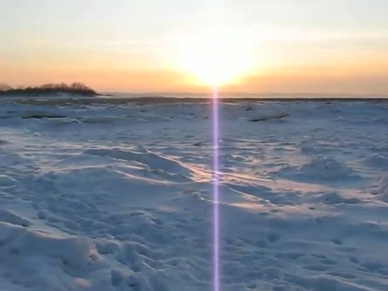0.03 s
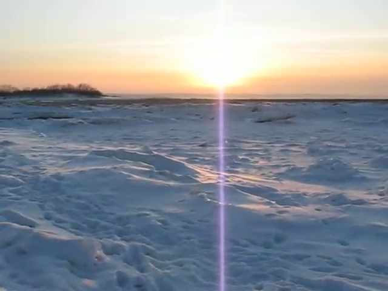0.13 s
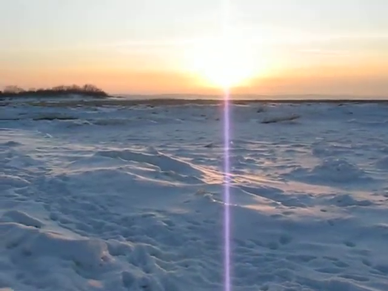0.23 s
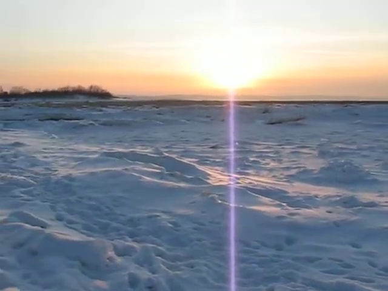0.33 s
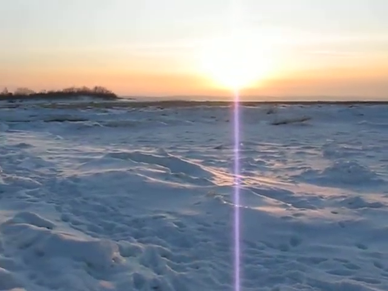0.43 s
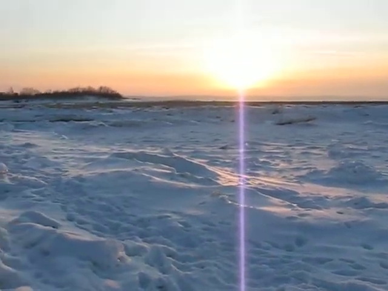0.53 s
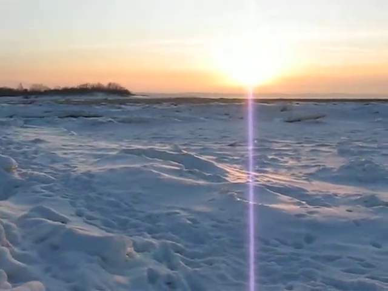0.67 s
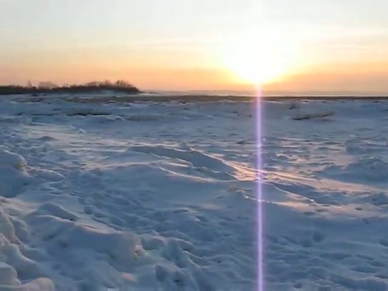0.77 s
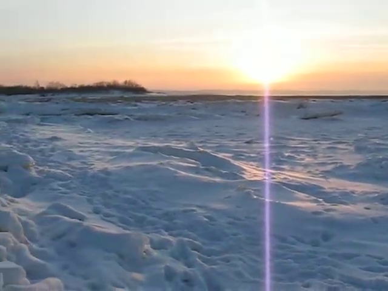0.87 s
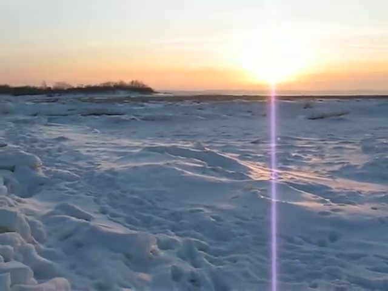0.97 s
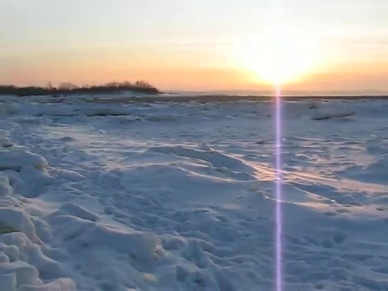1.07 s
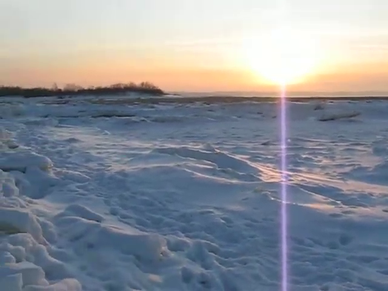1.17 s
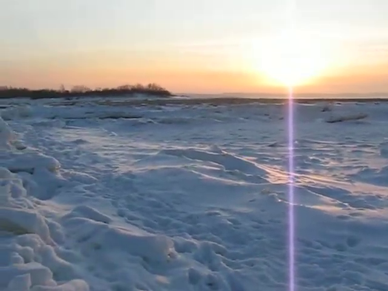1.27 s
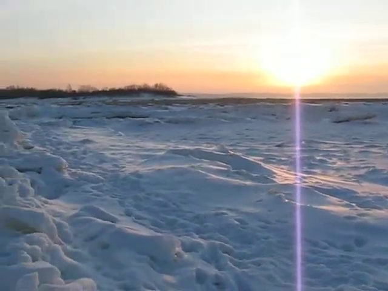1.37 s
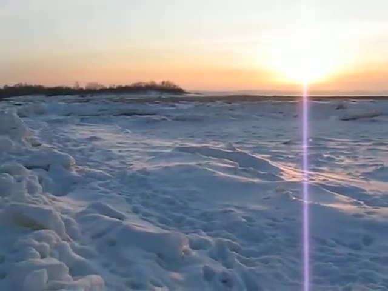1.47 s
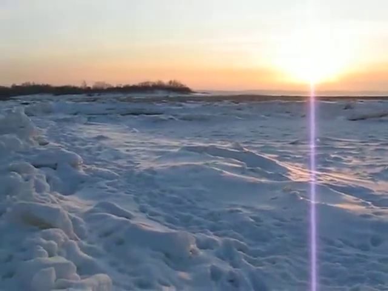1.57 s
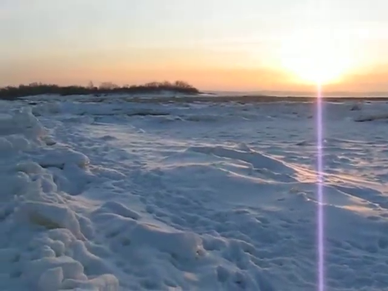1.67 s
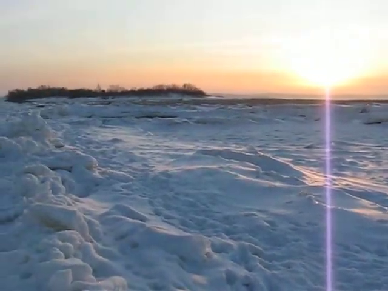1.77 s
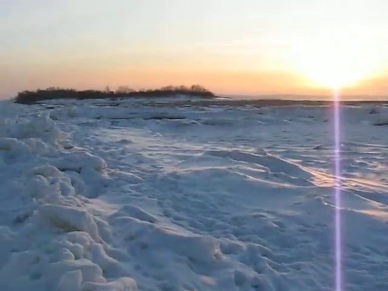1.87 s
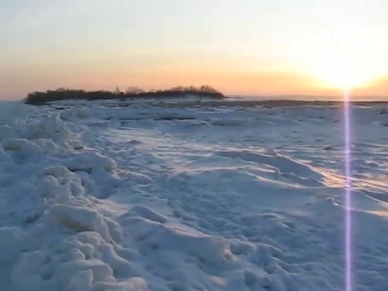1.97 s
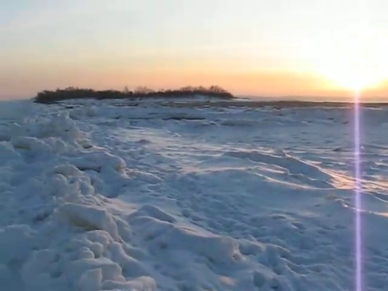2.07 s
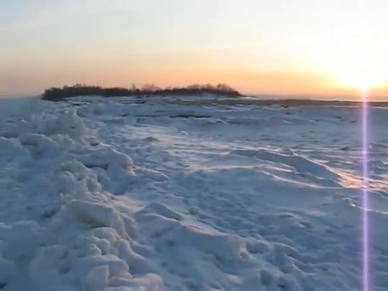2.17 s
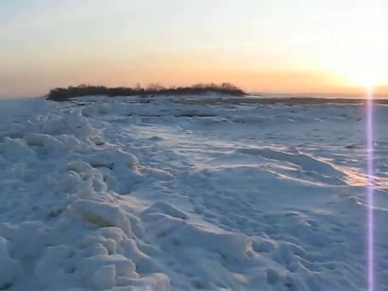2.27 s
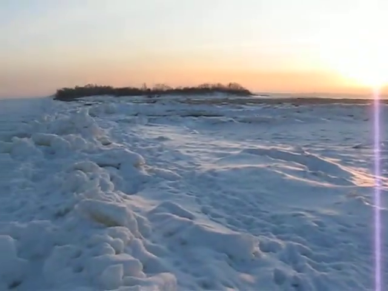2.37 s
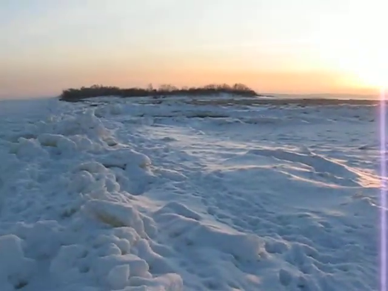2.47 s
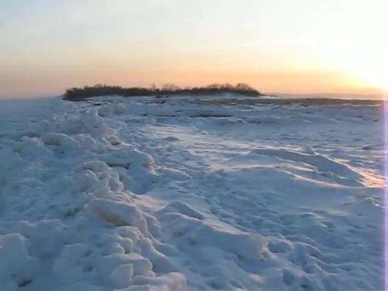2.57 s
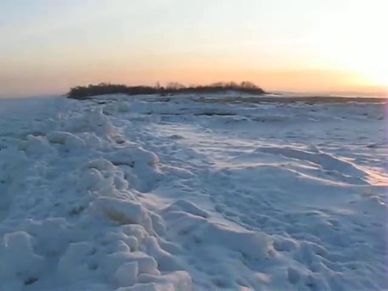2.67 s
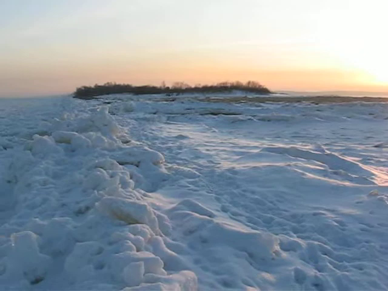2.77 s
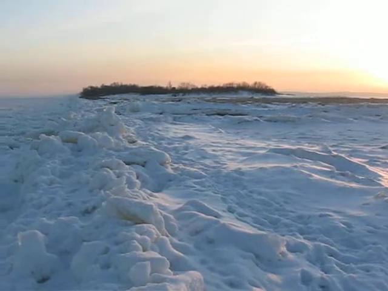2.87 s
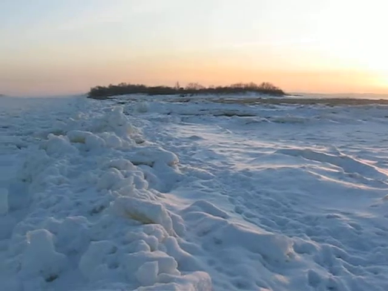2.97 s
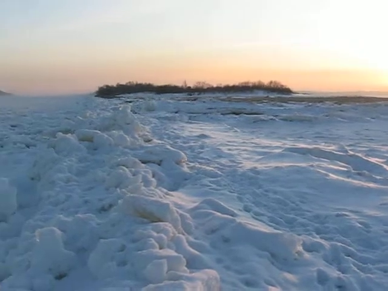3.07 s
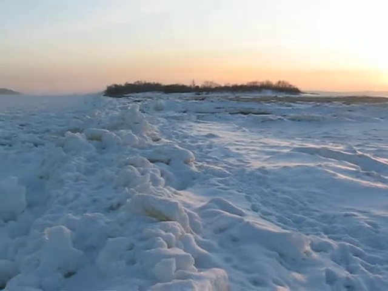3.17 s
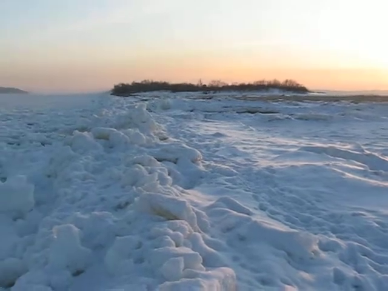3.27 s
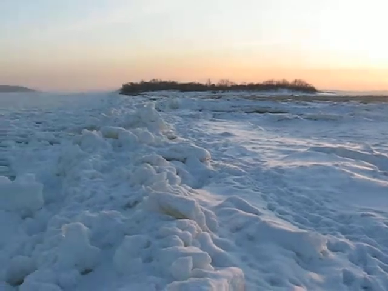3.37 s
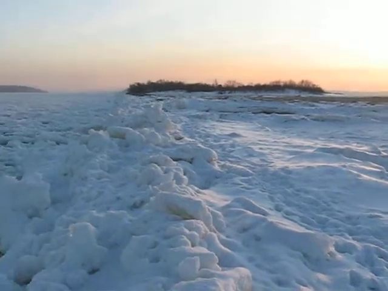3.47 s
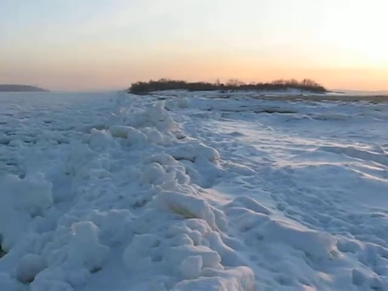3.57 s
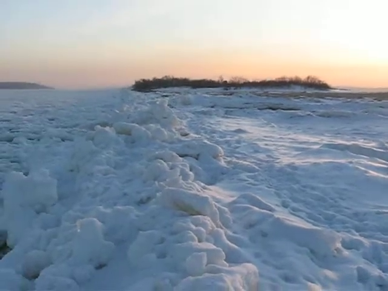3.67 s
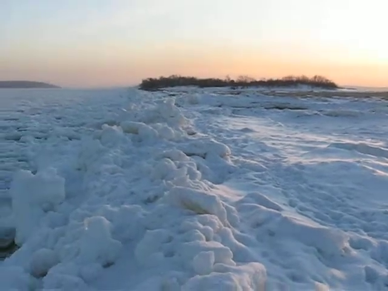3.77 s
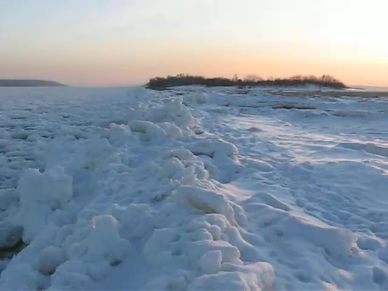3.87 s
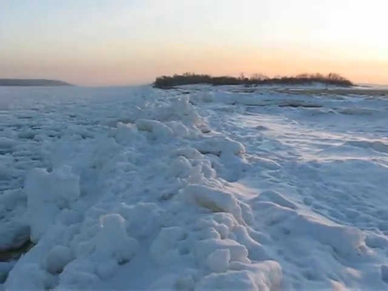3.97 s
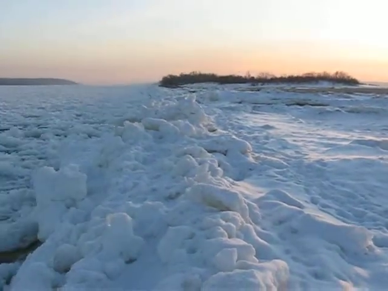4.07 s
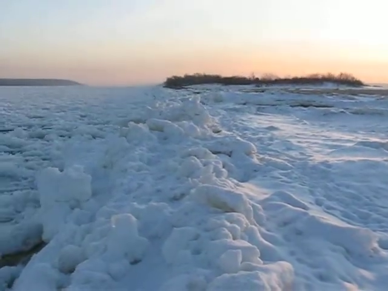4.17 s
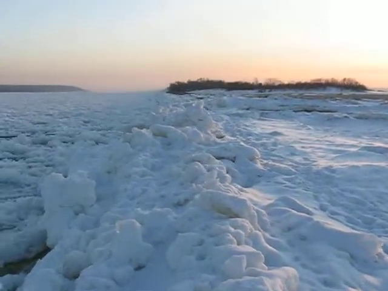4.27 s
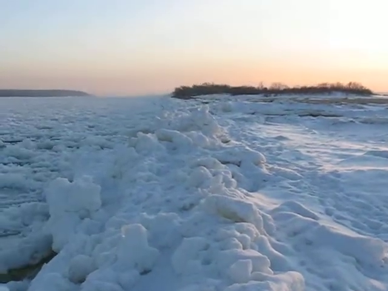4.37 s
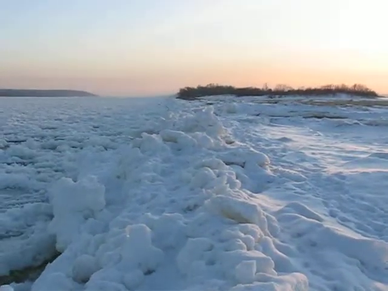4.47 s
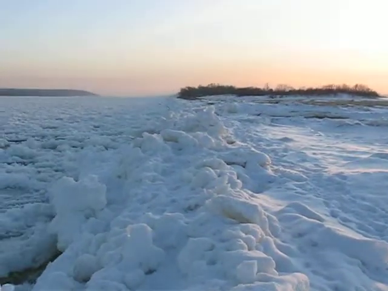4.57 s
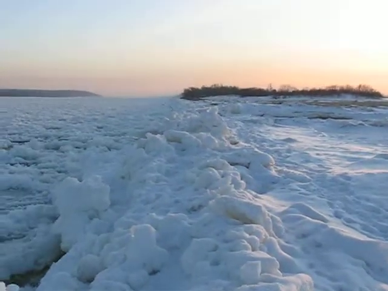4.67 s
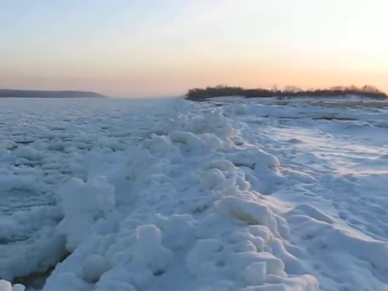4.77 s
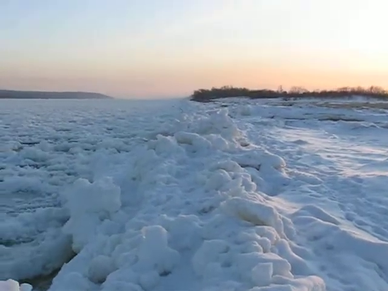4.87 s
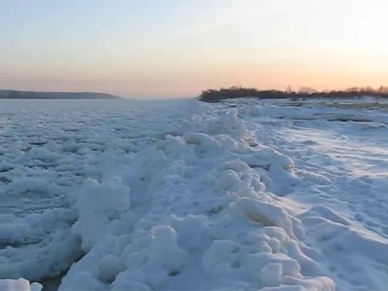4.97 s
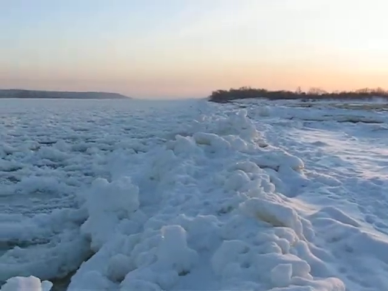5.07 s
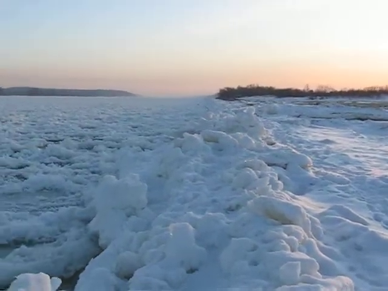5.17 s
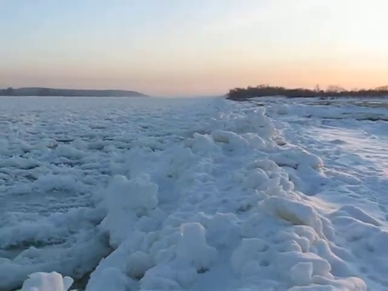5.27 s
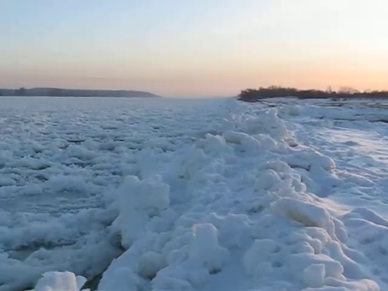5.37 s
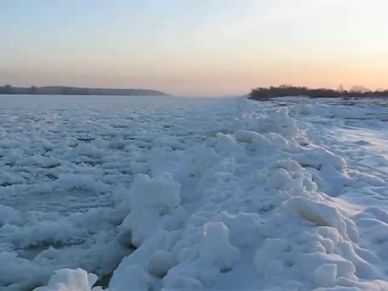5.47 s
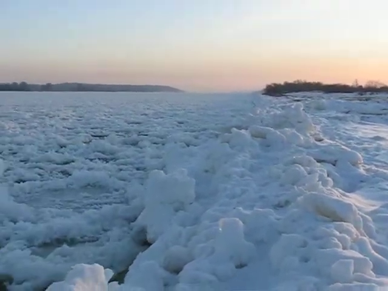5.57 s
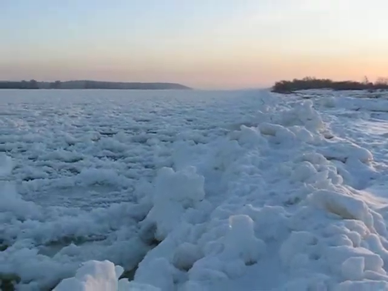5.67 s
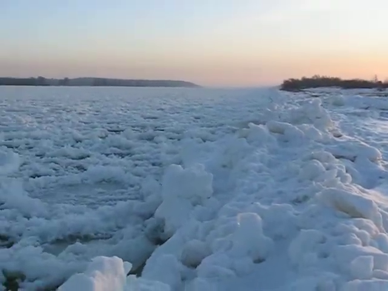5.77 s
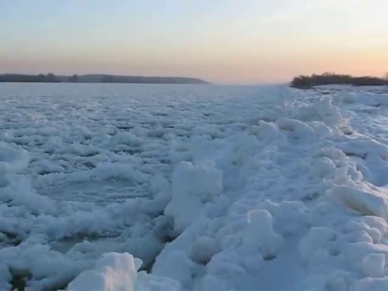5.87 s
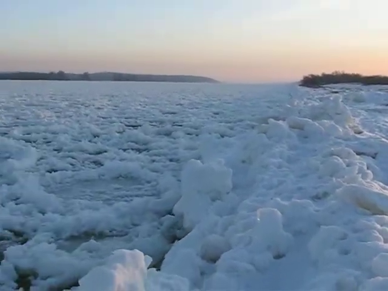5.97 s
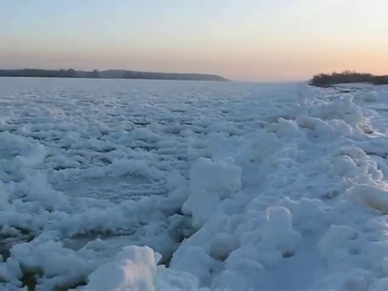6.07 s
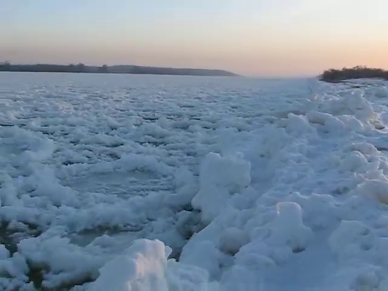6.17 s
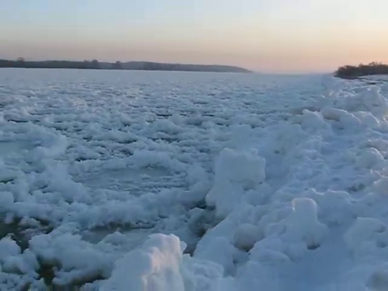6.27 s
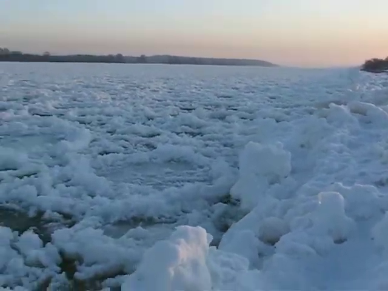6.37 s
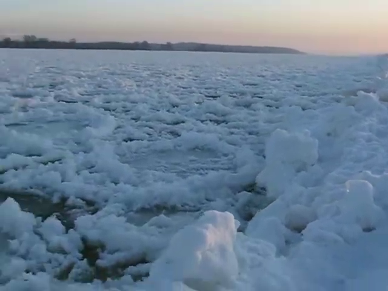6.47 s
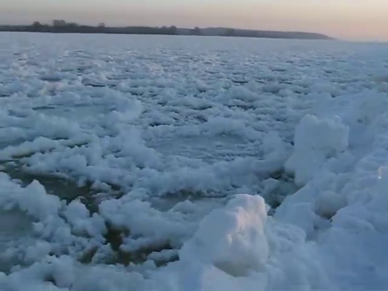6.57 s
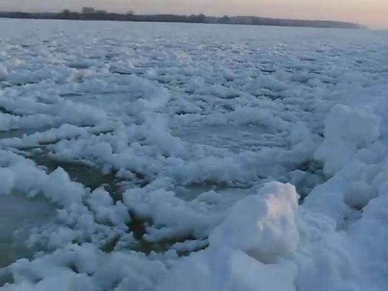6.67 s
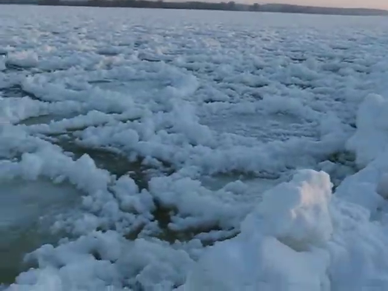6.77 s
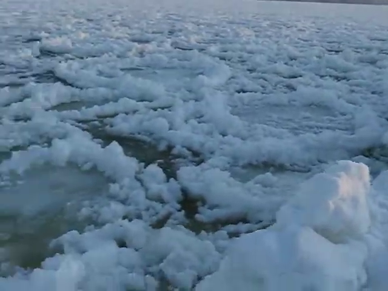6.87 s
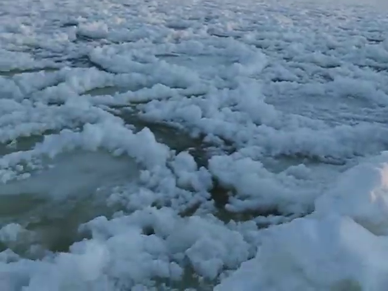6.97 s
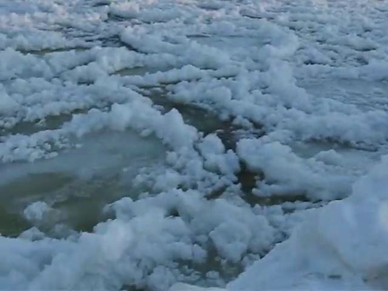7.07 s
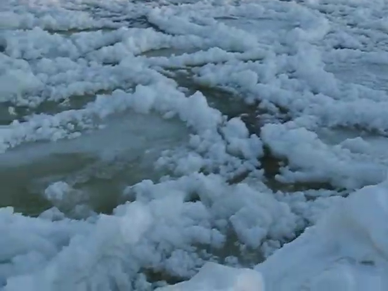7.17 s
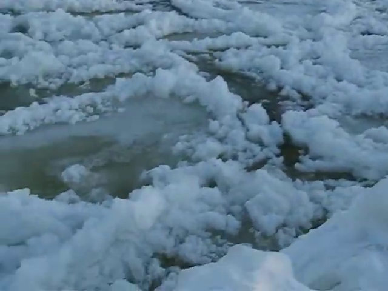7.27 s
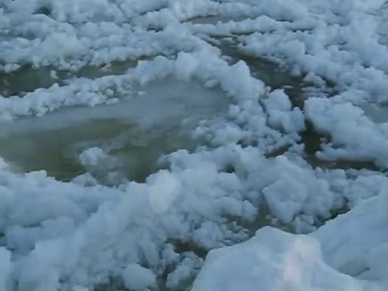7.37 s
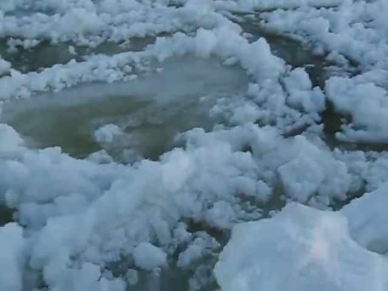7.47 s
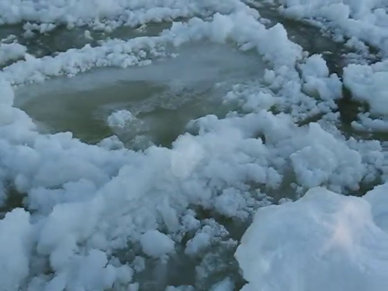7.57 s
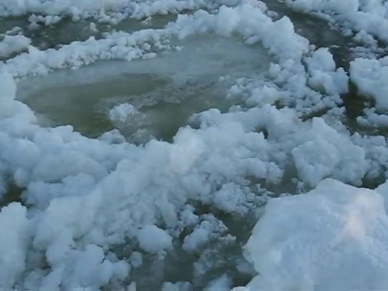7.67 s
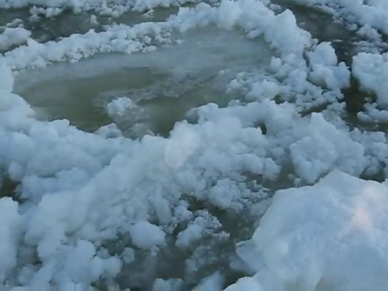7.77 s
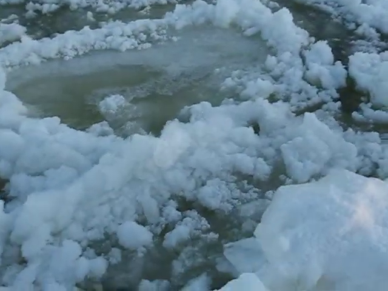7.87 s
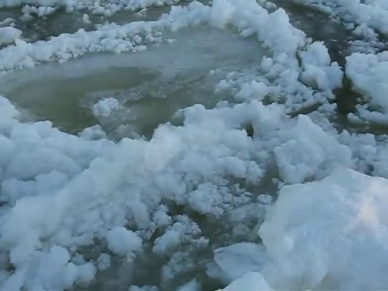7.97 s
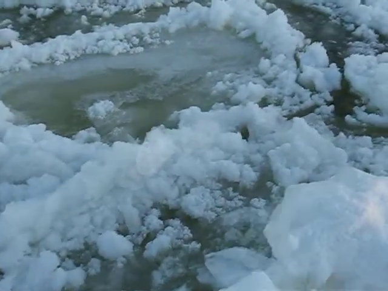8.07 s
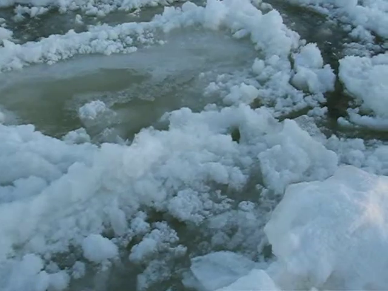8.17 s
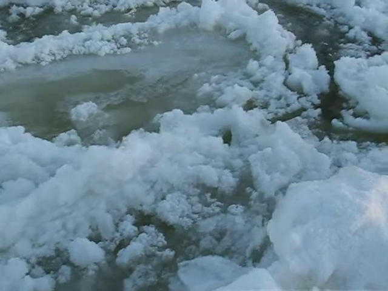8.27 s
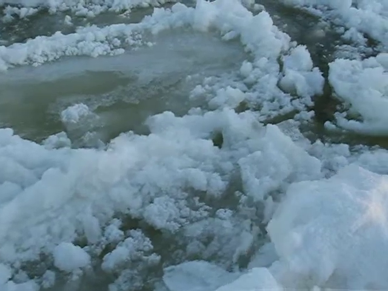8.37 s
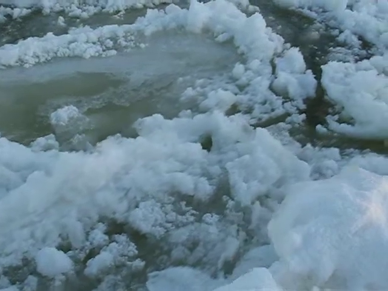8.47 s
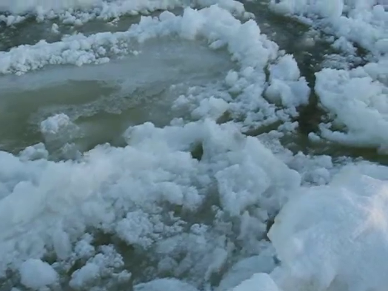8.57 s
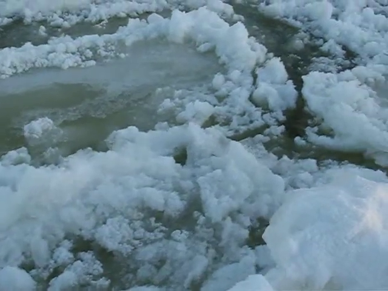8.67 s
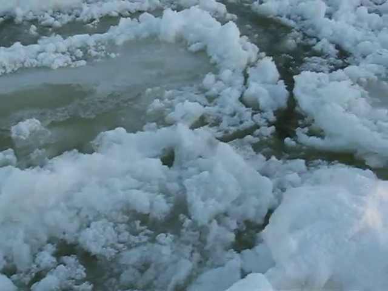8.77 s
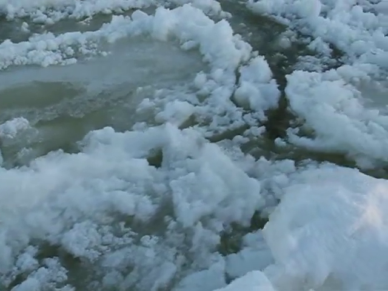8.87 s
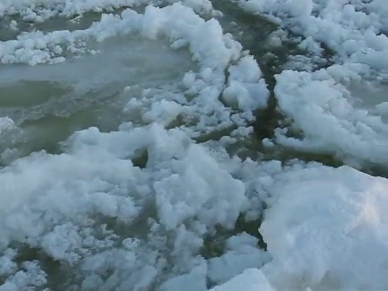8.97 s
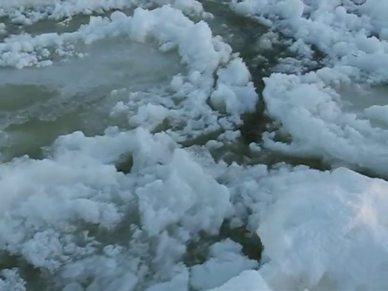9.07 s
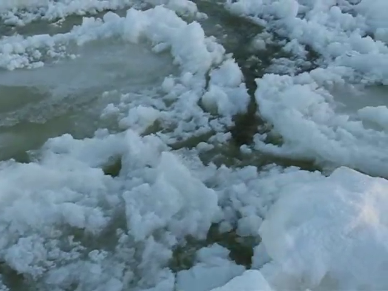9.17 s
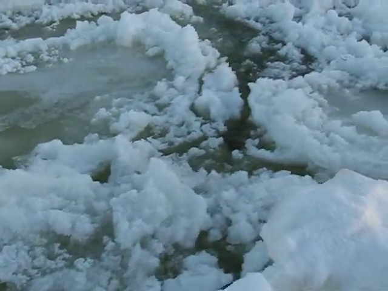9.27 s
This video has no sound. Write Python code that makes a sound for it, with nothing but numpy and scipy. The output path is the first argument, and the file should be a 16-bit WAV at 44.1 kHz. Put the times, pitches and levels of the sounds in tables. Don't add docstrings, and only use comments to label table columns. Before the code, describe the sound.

Drifting ice slush grinds, fizzes and crackles along a frozen shore, sharp snaps and ticks growing denser, while wind rumbles and slaps the microphone.

```python
import sys
import numpy as np
from scipy import signal
from scipy.fft import rfft, irfft, next_fast_len
from scipy.io import wavfile
from scipy.ndimage import map_coordinates

SR = 44100
rng = np.random.default_rng(int(sys.argv[2]) if len(sys.argv) > 2 else 0)


def boost(x):
    u = np.asarray(x, float) / 20
    return 10 ** u


def persist_wave(psi):
    counts = np.round(np.clip(psi, -1, 1) * 32767).astype(np.int16)
    wavfile.write(sys.argv[1], SR, np.atleast_2d(counts).T)


N = 411012
STEP = 40
CONTROL_S = np.arange(N // STEP + 2) * STEP / SR

# (time [s], side [1 = ice to the left, 0 = ice ahead])
SIDEWAYS = [
    (0, 1.17),
    (3.4, 1.11),
    (4.5, 0.97),
    (5.4, 0.85),
    (6, 0.69),
    (6.6, 0.41),
    (7.3, -0.088),
    (8.2, -0.36),
    (9.32, -0.28),
]


def in_time(rows):
    s, *columns = np.transpose(rows)
    return [np.interp(CONTROL_S, s, column) for column in columns]


def at_hz(points, hz):
    at, *columns = np.transpose(points)
    return [np.interp(np.log(hz), np.log(at), column) for column in columns]


def smooth(control):
    return np.interp(np.arange(N) / STEP, np.arange(len(control)), control)


def drift(rate):
    r = np.exp(-2 * STEP * np.pi * rate / SR)
    noise = rng.standard_normal(N // STEP + 1002)
    slow = signal.lfilter([1], [1, -2 * r, r * r], noise)[1000:]
    return slow / slow.std()


def flicker(wander, depth_db):
    gain = boost(depth_db * wander)
    return gain / np.sqrt(np.mean(gain ** 2))


def bands(x, colour, centres):
    size = next_fast_len(N)
    hz = np.maximum(np.arange(size // 2 + 1) * SR / size, 1)
    tone = boost(at_hz(colour, hz)[0]) * np.sqrt(SR / 2)
    spectrum = (rfft(x, size) * tone).astype(np.complex64)
    place = np.interp(np.log(hz), np.log(centres), np.arange(len(centres))).astype(np.float32)
    for k, centre in enumerate(centres):
        share = np.maximum(1 - np.abs(place - k), 0)
        yield centre, irfft(spectrum * share, size)[..., :N]


def delayed(x, lag_s):
    return map_coordinates(x, [np.arange(N) - lag_s * SR], order=3, mode="nearest")


def away(s, half_s):
    return np.abs(CONTROL_S - s) / np.maximum(half_s, .01)


def ice():
    layer_hz = (130, 450, 1900, 4200, 7200, 9500)
    # (frequency [Hz], level per Hz over the layer level [dB])
    ice_colour = [(30, -36), (200, -27.5), (450, -29), (750, -28), (1150, -32.5), (1600, -33),
                  (2500, -35.5), (3800, -36.5), (4700, -36.5), (6600, -34), (7500, -39.5), (8500, -50.5),
                  (9700, -56.5), (11500, -82)]
    # (frequency [Hz], level per Hz [dB])
    near_colour = [(100, -47), (300, -46.5), (1200, -44.5), (7500, -38.0), (9000, -53.5), (11500, -71)]
    # (frequency [Hz], left with ice ahead over ice to the side [dB],
    # right over left at the side [dB], the same ahead [dB],
    # likeness of the ports at the side [0-1], the same ahead [0-1], share going round the body [0-1])
    right_port = [(154, 5, -1, -1, 1, 1, 0.33), (766, -1.5, .5, 0.5, 0.98, 0.96, 0.093),
                  (1620, 2, 0.9, 1, 0.86, 0.98, 0.44), (2250, 0.5, 1.5, 4, 0.89, 0.7, 0.56),
                  (2970, -2.5, 0, 3, 0.92, 0.85, 0.69), (3600, -0.5, -4.5, -2, 0.97, 0.46, 0.74),
                  (4480, -1, -7, -3, 0.72, 0.68, 0.79), (5330, -1.74, -5.5, -2.8, 0.84, 0.82, .04),
                  (6670, -1.5, -7, 0.5, 0.96, 0.65, 0.36), (7720, 0.3, 5, 1, 0.73, 0.99, 0.094),
                  (9000, -2.5, -2, 6.5, 0.17, 0.12, .05)]
    straight_lag_s, round_lag_s = 8.2e-5, 0.00017

    layers_db = ice_levels()
    sideways = in_time(SIDEWAYS)[0]
    turned = np.clip((sideways - .5) / 0.69, 0, 1)
    centres = np.r_[np.geomspace(130, 1700, 5), np.geomspace(2400, 9500, 9)]
    field = np.array([grains(per_s=6000, spread_db=2.5, share=0.25),
                      grains(per_s=6000, spread_db=2.0, share=0.27)])
    near = crunches() + snaps() + shoves() + drips() + ticks()

    slips, rubs = drift(5.0), drift(91)
    neighbour = drift(25)
    left, straight, roundabout, others = np.zeros((4, N))
    far_bands, near_bands = bands(field, ice_colour, centres), bands(near, near_colour, centres)
    for (hz, (common, own)), (_, hits) in zip(far_bands, near_bands):
        layer_share = [np.interp(np.log(hz), np.log(layer_hz), row) for row in np.eye(len(layer_hz))]
        left_db, side_db, ahead_db, side_like, ahead_like, share = at_hz(right_port, hz)
        share = np.clip(share, 0, 1)

        patch = drift(16.5)
        chips = 0.57 * (patch + neighbour) + 1.24 * drift(170) + 0.11 * drift(16.0)
        treble = np.clip(np.log2(hz / 500) / 2.4, .15, 1)
        loudness = boost(layer_share @ layers_db + (1.5 - turned) * left_db)
        gain = loudness * flicker(0.32 * slips + 0.65 * rubs + chips, treble)

        right = boost(ahead_db + turned * (side_db - ahead_db))
        alike = np.clip(ahead_like + turned * (side_like - ahead_like), 0, 1)
        heard = smooth(gain) * common + hits
        shared = smooth(right * alike) * heard
        left += heard
        straight += (1 - share) * shared
        roundabout += share * shared
        others += smooth(right * np.sqrt(1 - alike ** 2) * gain) * own
        neighbour = patch

    lag = smooth(sideways)
    right_ear = delayed(straight, lag * straight_lag_s) + delayed(roundabout, lag * round_lag_s) + others
    return np.array([left, right_ear])


def ice_levels():
    # (time [s], grinding pressure [dB], fineness of the slush [dB])
    grind = [(0, -33, -3), (.9, -30.5, -3), (1.15, -27.5, -0.5), (1.8, -25.5, -2), (2.7, -21.5, -1),
             (3.3, -24.5, -0.5), (3.6, -25, -3), (4.3, -25.5, -1), (5.0, -27.5, -1.3), (5.5, -27, 1),
             (5.92, -23, 5), (6.1, -20.5, -3.5), (6.9, -20, -4.5), (7.66, -21, -2.5), (7.73, -27.5, 3.5),
             (8.4, -28, 1), (8.9, -27.5, 1.5), (9.15, -25, -2)]
    # (time [s], half length
    # [s], pressure change [dB], far roar change [dB])
    surges = [(.24, 0.084, 0.3, -1), (0.697, 0.078, 3.5, -1.5), (1.3, 0.49, -0.7, 2),
              (2.034, 0.043, 1.5, -1), (2.365, 0.088, 0.5, -0.5), (3.6, 0.052, 0.5, 1.5),
              (4.04, .1, 0.5, 1.3), (5.395, 0.11, 0.5, 2), (5.677, .09, 1, -0.5), (5.87, 0.099, -4.5, -3),
              (6.12, 0.29, 3, 4), (6.5, 0.12, 1.5, 0.5), (7.08, 0.064, -2.5, 0.5), (7.314, 0.067, 1, -2.5),
              (7.427, 0.093, -3, 1), (7.95, 0.13, 2, 2.5), (8.127, 0.055, 0.8, 3),
              (8.286, 0.038, 2.5, -0.5), (8.7, 0.076, 1.5, -2.3), (8.904, 0.054, 4, -2),
              (8.997, 0.055, 0, -2.8), (6.002, .013, -3, 0), (7.235, .015, 0.5, 3), (6.272, .02, -2.5, -2),
              (6.77, .03, -1, -2)]
    grind_db, fine_db = in_time(grind)
    s, half_s, push_db, swell_db = np.transpose(surges)[..., None]
    bump = 2.0 ** -away(s, half_s) ** 2
    fizz_db = grind_db + np.sum(push_db * bump, 0)
    swing_db = fizz_db + 26.5
    rumble_db = np.full_like(fizz_db, -31)
    roar_db = -30.5 + 0.054 * swing_db + np.sum(swell_db * bump, 0)
    rub_db = -31 + 0.63 * swing_db - 0.18 * fine_db
    return np.array([rumble_db, roar_db, rub_db, fizz_db, fizz_db + 0.39 * fine_db, fizz_db + fine_db])


def grains(per_s, spread_db, share):
    sizes = boost(spread_db * np.minimum(rng.exponential(1, N), 5)) * rng.choice([-1, 1], N)
    clicks = sizes * (rng.random(N) < per_s / SR)
    return np.sqrt(share) * clicks / clicks.std() + np.sqrt(1 - share) * rng.standard_normal(N)


def crackles(rows, ring, spread):
    longest_s = np.max(rows, 0)[3]
    t = np.arange(int(7 * SR * longest_s)) / SR
    out = np.zeros(N + SR)
    for s, db, hz, length in rows:
        age = t / max(length, .0003)
        burst = rng.standard_normal(len(t)) * age ** 1.7 * np.exp(-1.5 * age)
        band = signal.butter(1, [hz / spread, min(hz * spread, 11000)], "band", fs=SR, output="sos")
        body = signal.sosfilt(band, burst)
        sound = ring * body / np.abs(body).max() + (1 - ring) * burst / np.abs(burst).max()
        at = max(round((s - .4 * length) * SR), 0)
        out[at:at + len(t)] += boost(db) * sound / np.abs(sound).max()
    return out[:N]


def crunches():
    # (time [s], peak [dB], pitch [Hz])
    lumps = [(0.4439, -40, 1690), (4.011, -17, 4480), (1.03, -25, 2500), (3.4974, -27, 1810),
             (4.008, -10, 1760), (4.117, -14, 4180), (4.496, -14.5, 2070), (6.026, -11.5, 2570),
             (6.551, -12, 5900), (6.574, -13, 1790), (6.668, -10.5, 3000), (6.684, -18, 6040),
             (6.894, -13, 5200), (7.156, -13, 1520), (7.351, -14, 2220), (7.461, -9, 5230),
             (7.552, -18, 3000), (7.665, -16, 4000), (7.595, -11.5, 2300), (7.878, -14, 1800),
             (7.893, -7.5, 4500), (7.908, -16, 2360), (7.928, -23, 2500), (8.065, -15, 3970),
             (8.4957, -13.5, 6800), (8.66, -16, 1500), (8.73, -21, 1500), (8.8992, -18, 5470),
             (8.952, -17, 7250)]
    return boost(2.0) * crackles([(*lump, .006) for lump in lumps], ring=0.26, spread=1.1)


def snaps():
    # (time [s], peak [dB], pitch [Hz])
    thin_ice = [(2.274, -20, 4230), (3.9104, -8, 5700), (6.832, -14, 2500), (4.8384, -8, 5570),
                (5.288, -22, 6940), (5.532, -3.5, 4130), (5.948, -4, 6550), (6.407, -11, 5340),
                (6.14, -9, 6280), (6.1769, -8, 3870), (6.584, -14, 3500), (6.9843, -6.5, 6000),
                (7.033, -8, 3000), (7.051, -6, 6400), (7.2673, -5, 6540), (7.296, -8, 5590),
                (7.3218, -8, 6530), (7.5313, -6, 5000), (7.6221, -6.5, 6770), (7.9204, -14, 4960),
                (7.9775, -5, 5500), (8.4783, -7, 6100), (8.5186, -7, 5500), (8.5685, -9, 6800),
                (8.5806, -5, 7000), (8.5984, -14, 7180), (9.005, -11, 4200), (9.0594, -12, 6500)]
    return boost(-4.5) * crackles([(*snap, .0015) for snap in thin_ice], ring=0.2, spread=1.03)


def shoves():
    # (time [s], peak [dB], pitch [Hz], length [s])
    pushes = [(0.52, -24, 395, 0.045), (.042, -13.5, 247, .01), (4, -22, 580, 0.0052),
              (6.14, -13.5, 3840, 0.087), (1.028, -21, 2600, 0.0043), (.66, -22, 3700, 0.011),
              (6.08, -31, 670, .1), (4.828, -14, 520, 0.0063), (2.26, -20, 2060, 0.014),
              (2.3, -31, 1780, 0.02), (0.44, -25, 360, 0.01), (4.2632, -30, 4700, 0.00206),
              (0.48, -32, 2300, 0.0041), (7.89, -19, 2000, 0.0069), (0.54, -27, 414, .05),
              (6, -15, 5400, 0.0036)]
    return crackles(pushes, ring=0.86, spread=1.08)


def ticks():
    # (time [s], peak [dB], pitch [Hz])
    chips = [(0.4456, -21, 1900), (2.277, -20, 2100), (3.9105, -23, 2000), (4.0176, -18, 4200),
             (4.1215, -14, 4000), (4.2648, -13, 4800), (4.0465, -18, 1800), (4.141, -17, 6700),
             (5.533, -16, 1900), (5.9529, -9, 6700), (6.1419, -13, 6200), (6.24, -7, 2100),
             (6.4216, -12, 1900), (6.4431, -9, 2400), (6.5535, -15, 6000), (6.5552, -11, 6300),
             (6.5675, -11, 5900), (6.5753, -11, 3300), (6.585, -10, 5900), (6.6745, -10, 3500),
             (6.6788, -9, 5700), (6.6853, -14, 5900), (6.89, -15, 5100), (6.8949, -17, 5400),
             (6.9856, -9, 7000), (7.0336, -10, 2800), (7.0524, -9, 4600), (7.1232, -13, 6500),
             (7.1595, -13, 1900), (7.1763, -15, 2200), (7.2666, -14, 6500), (7.2695, -10, 6600),
             (7.2962, -13, 5800), (7.323, -17, 6500), (7.3495, -12, 6700), (7.4651, -14, 6000),
             (7.4702, -17, 5200), (7.4732, -17, 4900), (7.4766, -15, 5600), (7.5323, -9, 5300),
             (7.5547, -11, 2000), (7.5637, -13, 2200), (7.5931, -12, 2100), (7.603, -9, 2300),
             (7.6236, -11, 4600), (7.6744, -15, 6300), (7.8971, -10, 2200), (7.9086, -15, 3900),
             (7.9208, -10, 2500), (7.979, -10, 3500), (8.068, -18, 4000), (8.4801, -15, 7400),
             (8.52, -15, 6800), (8.567, -15, 6100), (8.5701, -11, 6700), (8.5819, -6, 7000),
             (8.5997, -15, 7000), (8.9582, -16, 6700), (9.0063, -15, 3600), (9.1522, -14, 6500)]
    rise_s, fall_s, crack_share = .00015, 0.00031, 0.94
    before = 60
    t = np.arange(-before, 200) / SR
    shape = np.exp(np.minimum(t / rise_s, -t / fall_s))
    out = np.zeros(N + SR)
    for s, db, hz in chips:
        at = round(s * SR) - before
        ring = shape * np.cos(2 * np.pi * hz * t)
        out[at:at + len(t)] += boost(db + 1) * (ring + crack_share * (t == 0))
    return out[:N]


def drips():
    # (time [s], peak [dB], start pitch [Hz], rise [octaves], length [s])
    short_rings = [(9.0035, -15, 3560, 0.38, 0.0058), (8.865, -20, 1420, .2, 0.0044),
                   (9.15, -25, 6500, .1, 0.0046), (.586, -16, 350, -1.4, 0.019), (0.675, -25, 310, .4, .026),
                   (0.61, -19, 400, -0.97, .016), (.748, -23, 275, 0.49, 0.018), (0.5, -24, 380, .05, .016),
                   (2.269, -26, 2050, -.08, 0.035), (2.6, -28, 1600, 0.032, 0.043),
                   (2.427, -23.5, 1800, 0.11, .03), (2.468, -24, 1240, .02, .016),
                   (7.89, -20, 2210, .05, 0.0038), (7.913, -18, 2370, .05, 0.0054),
                   (7.933, -22, 2400, .1, 0.0035), (7.47, -21, 3600, .1, 0.0053),
                   (7.9193, -13.5, 2520, .05, .003), (.4446, -24, 2000, .2, .002),
                   (6.552, -12, 5900, .05, .004), (5.5, -15, 6400, 0.25, 0.0013),
                   (2.36, -27, 1750, -0.085, .04), (7.601, -17.5, 1460, .05, 0.0076),
                   (4.015, -24, 1750, .05, .005), (.868, -26, 690, .02, .02)]
    out = np.zeros(N)
    for s, db, hz, rise, length in short_rings:
        t = np.arange(int(length * SR)) / SR
        turns = np.cumsum(hz * 2 ** (rise * (t / length) ** 2)) / SR
        swell = np.sin(np.pi * (t / length) ** .7)
        at = round(s * SR)
        out[at:at + len(t)] += boost(db) * swell * np.sin(2 * np.pi * turns)
    return out


def scrapes():
    # (time [s], length [s], level [dB], from pitch [Hz], to pitch [Hz])
    passings = [(2.7, .1, -38, 2000, 1700), (2.5, .19, -39, 1850, 1750), (6.08, 0.93, -32.5, 3400, 3700),
                (6.07, 0.76, -36, 1750, 1750), (.45, .12, -37, 380, 460), (.56, .26, -34.5, 380, 340),
                (0.66, .22, -36, 450, 420), (.58, .25, -37, 520, 620), (.66, 0.121, -36, 200, 290),
                (8.6, .03, -32, 3900, 4100), (7.55, 0.1, -40, 4000, 4300), (6.7, .15, -32, 1600, 1550),
                (6.7, 0.11, -36, 1900, 2700), (7.87, 0.084, -36, 1900, 2700), (6.53, .09, -28, 6200, 6000)]
    out = np.zeros(N)
    for s, length, db, from_hz, to_hz in passings:
        age = np.arange(int(length * SR)) / (length * SR)
        half_width_hz = 45 + .07 * from_hz
        low_pass = signal.butter(4, half_width_hz, fs=SR, output="sos")
        slow = signal.sosfilt(low_pass, rng.standard_normal((3, SR)))[:, -len(age):]
        slow = slow / slow.std()
        turn = 2 * np.pi * np.cumsum(from_hz + (to_hz - from_hz) * age) / SR
        band = slow[0] * np.cos(turn) + slow[1] * np.sin(turn)
        grit = boost(3 * slow[2])
        at = round(s * SR)
        out[at:at + len(age)] += boost(db) * np.sqrt(np.sin(np.pi * age)) * band * grit
    lag_s = smooth(in_time(SIDEWAYS)[0]) * .0002
    return np.array([out, delayed(out, lag_s)])


def groans():
    # (time [s], peak [dB], pitch [Hz], length [s])
    heavy_floe = [(.6, -27, 420, .06), (.7, -34, 450, 0.046), (6.6, -21, 330, 0.061),
                  (.49, -31, 420, 0.029), (.77, -29, 503, 0.031), (6.03, -13, 700, .008),
                  (6.065, -16, 650, 0.0083), (6.205, -16, 600, .007), (6.242, -15, 650, 0.0041),
                  (6.305, -20, 550, .008), (6.83, -23, 1400, 0.0068), (6.16, -24, 1700, 0.023)]
    return crackles(heavy_floe, ring=1, spread=1.3)


def wind():
    # (time [s], peak [dB], half length [s])
    left_gusts = [(.09, -23, 0.055), (.27, -26, 0.046), (.54, -21.5, 0.075), (.8, -30, 0.094),
                  (1.15, -16.5, 0.044), (1.44, -25, 0.067), (1.8, -27, .05), (2.06, -25, .13),
                  (2.47, -31, .07), (3.0, -32.5, .09), (3.97, -36, .09), (4.66, -38, .1), (5.05, -42, .15),
                  (5.58, -33, .08), (5.85, -36, 0.076), (6.21, -54, .05), (6.7, -28, 0.057),
                  (6.89, -16, 0.095), (7.09, -33, .06), (7.24, -17, 0.16), (7.48, -17.5, 0.12),
                  (7.65, -16.5, .05), (7.87, -13, 0.094), (8.08, -24, 0.072), (8.2, -12, 0.16),
                  (8.36, -32, .07), (8.58, -14, 0.064), (8.79, -15.5, .09), (9.05, -20, .09),
                  (9.33, -22, 0.041)]
    right_gusts = [(.05, -29, .11), (.27, -27, 0.055), (1.27, -26.5, .06), (1.466, -20.5, 0.074),
                   (1.83, -26, 0.083), (2.108, -12.5, 0.057), (2.448, -17, 0.045), (2.59, -19, 0.11),
                   (3.0, -27, 0.1), (3.19, -25, 0.15), (3.334, -14.5, 0.048), (3.527, -12, 0.099),
                   (3.65, -19, 0.066), (3.79, -14.5, 0.099), (3.95, -24.5, .08), (4.237, -14, 0.032),
                   (5.06, -25, 0.17), (5.386, -22.5, 0.035), (5.673, -17.5, 0.048), (6.326, -16.5, 0.056),
                   (6.513, -16.5, 0.1), (6.84, -18, 0.054), (7.03, -25, 0.095), (7.22, -23, .1),
                   (7.5, -25, .12), (8.05, -26, .08), (8.202, -16.5, 0.068), (8.565, -16, 0.031),
                   (8.82, -20.5, 0.12), (9.07, -19, 0.083)]
    # (time [s], left port [dB], right port [dB])
    breeze = [
        (0, -48, -35),
        (1.7, -40, -37),
        (3.4, -53, -27),
        (4.6, -49, -27.5),
        (6.2, -42, -27),
        (7.8, -34, -29),
        (8.45, -24, -42),
        (9.32, -40, -31),
    ]
    # (frequency [Hz], level per Hz [dB])
    wind_colour = [(10, -45), (22, -33.5), (44, -19.5), (70, -17), (160, -22.5), (210, -28), (280, -38),
                   (400, -38.5), (700, -78), (1500, -98)]
    out = np.zeros((2, N))
    for port, gust_db in enumerate(map(gust_level, (left_gusts, right_gusts), in_time(breeze))):
        eddies = 0.44 * drift(22) + 1.27 * drift(32.5)
        for hz, rumble in bands(rng.standard_normal(N), wind_colour, np.geomspace(30, 400, 4)):
            reach_db = 0.28 * np.log2(hz / 60) * (gust_db + 15.0)
            depth_db = 0.66 + 0.76 * np.log2(hz / 30)
            lumps = flicker(eddies + 0.29 * drift(28), depth_db)
            out[port] += smooth(boost(gust_db + reach_db - 2.0) * lumps) * rumble
    return out


def gust_level(gusts, breeze_db):
    s, db, half_s = np.transpose(gusts)[..., None]
    edge = 1.15
    power = boost(db - 6 * away(s, half_s) ** edge) ** 2
    return 10 * np.log10(power.sum(0) + boost(breeze_db) ** 2)


def slaps():
    # (time [s], peak [dB], left over right [dB])
    hits = [(0.036, -16, 8), (1.125, -17, 19), (1.288, -15, -0.5), (1.459, -8.5, 0.5), (1.953, -12, 0.5),
            (2.086, -21, -15.5), (2.084, -3, -13), (2.369, -22.5, 2), (3.116, -16, -14),
            (3.295, -15, -18.5), (3.329, -11, -21.5), (3.625, -4, -24.5), (3.739, -5, -16),
            (3.886, -9.5, -11), (4.206, -12, -14.5), (5.634, -12, -14.0), (5.678, -17, -11), (6.82, -15, 4),
            (7.028, -17, 1.5), (8.261, -13, 11), (8.412, -19, 13), (8.744, -5, 17.5), (8.873, -2.5, 9),
            (8.998, -21, 1), (6.881, -11, 9), (6.303, -12, -12), (6.459, -12, -14), (6.494, -11.5, -12),
            (6.52, -13, -10), (6.559, -9, -12), (8.168, -8, 8), (7.652, -12, 8), (8.044, -11, 10)]
    out, t = np.zeros((2, N + 2000)), np.arange(2000) / SR
    for s, db, pan_db in hits:
        sign, size = rng.random(2)
        age = t / (.0011 + .0007 * size) - 3
        push = np.sign(sign - .7) * (1 - age ** 2) * np.exp(-age ** 2 / 2)
        at = round((s + 0.00695) * SR)
        port_db = db + 1.5 * np.minimum([[pan_db], [-pan_db]], 0)
        out[:, at:at + len(t)] += boost(port_db) * push
    return out[:, :N]


def scene():
    return ice() + scrapes() + groans() + wind() + slaps()


def top_cut(x):
    return signal.sosfilt(signal.butter(12, 11200, fs=SR, output="sos"), x)


def record(dry):
    limit = .86
    held = dry / (1 + np.abs(dry / limit) ** 6) ** (1 / 6)
    return top_cut(held)


dry = scene()
out = record(dry)
persist_wave(out)
```